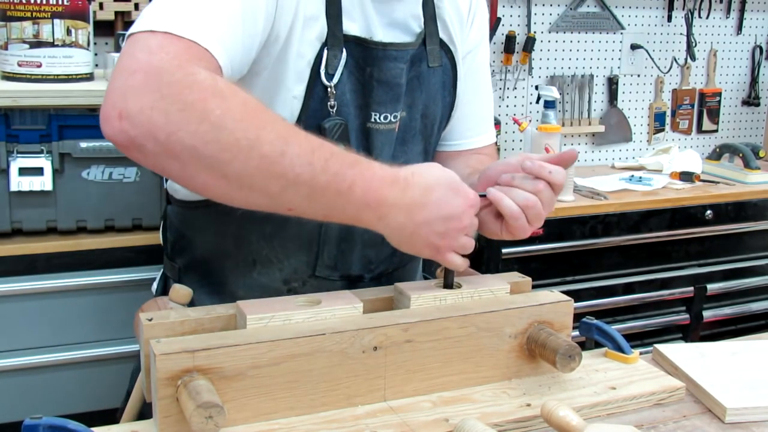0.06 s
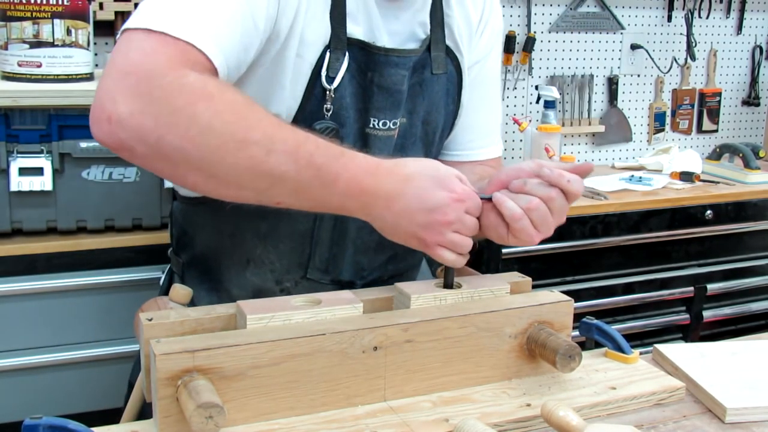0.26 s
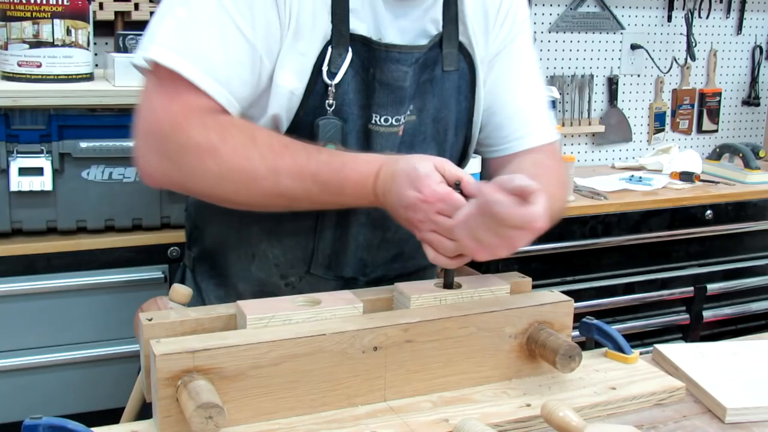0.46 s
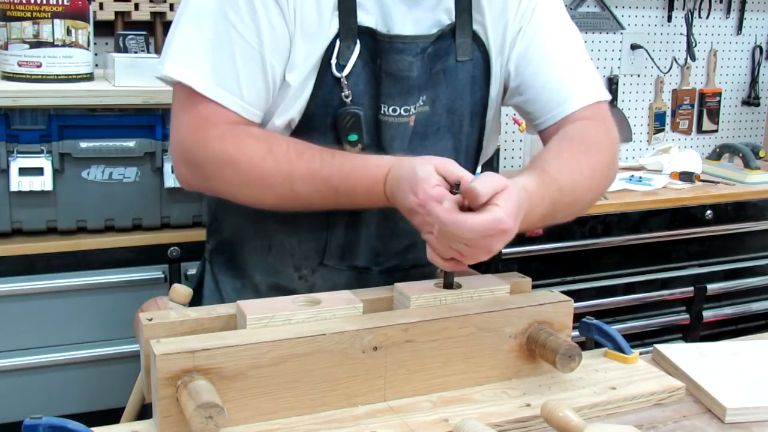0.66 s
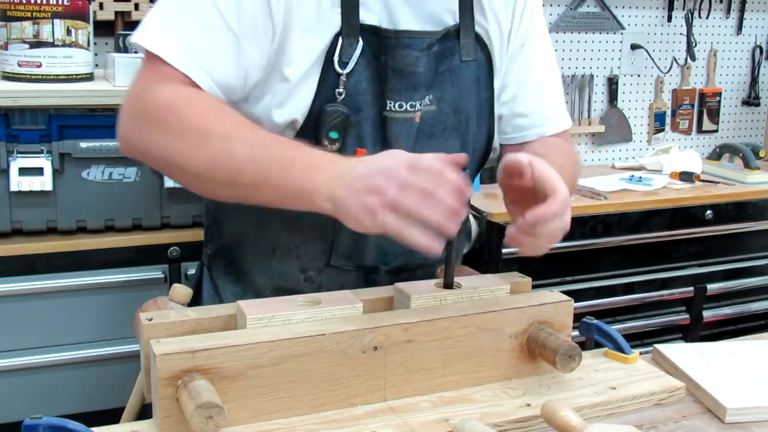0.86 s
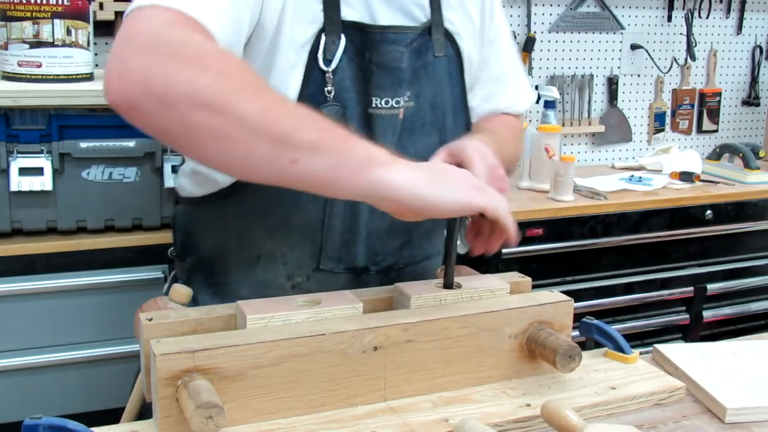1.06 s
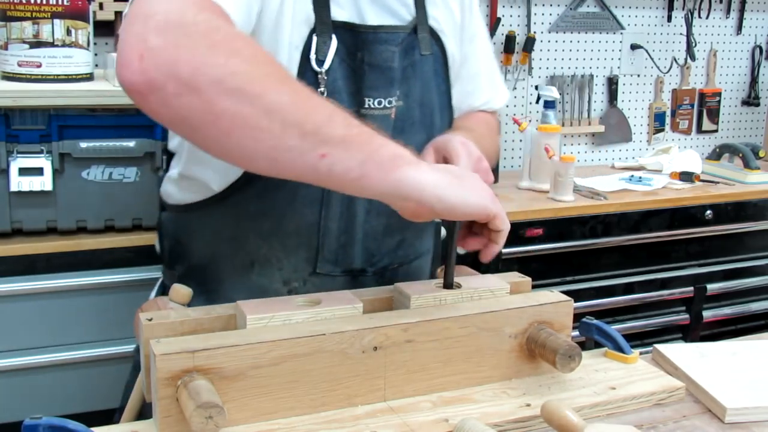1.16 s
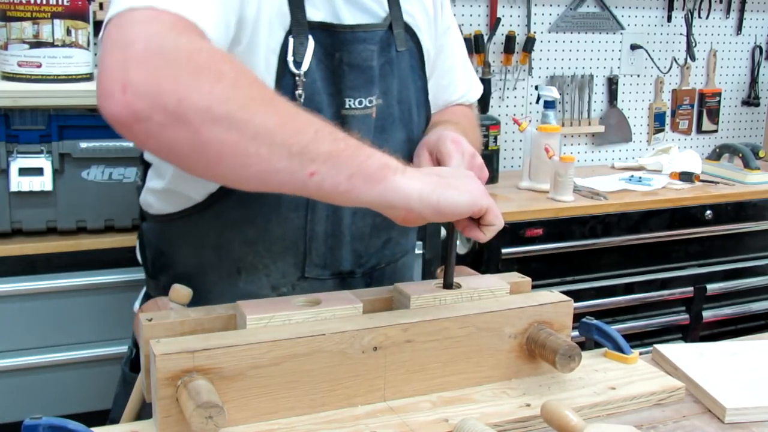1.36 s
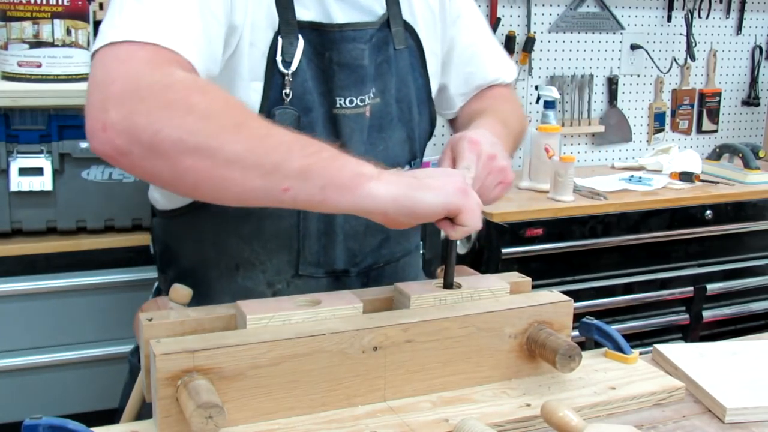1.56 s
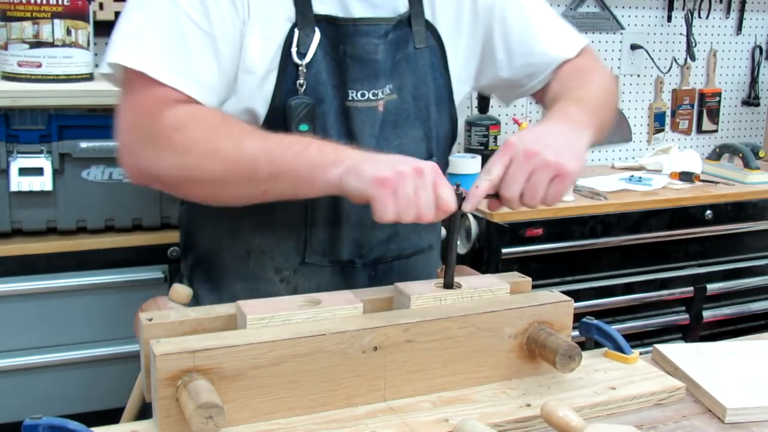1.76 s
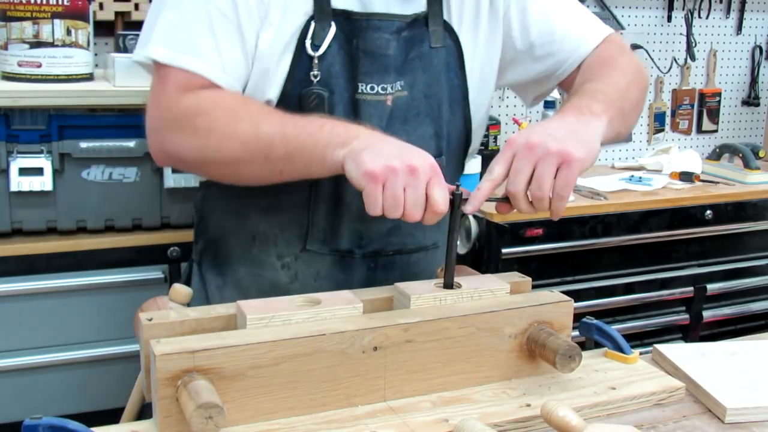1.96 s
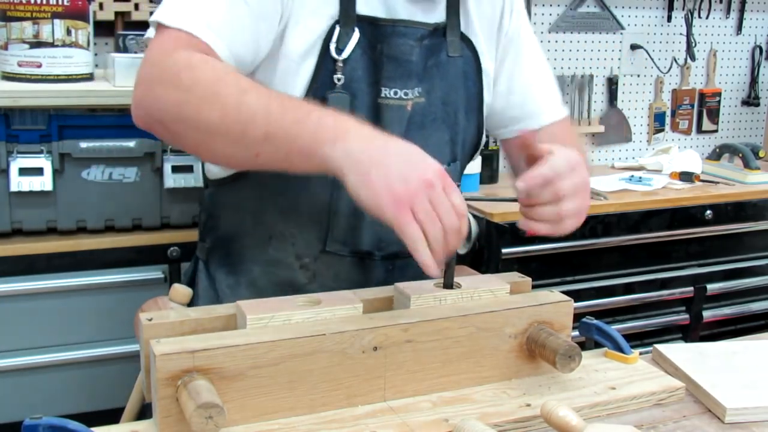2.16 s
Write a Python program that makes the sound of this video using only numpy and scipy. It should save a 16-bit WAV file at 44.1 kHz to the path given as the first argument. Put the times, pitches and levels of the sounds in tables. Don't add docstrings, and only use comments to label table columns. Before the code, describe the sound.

A hand-turned tap scrapes threads into a wooden block, with sharp handle clicks in a small workshop

```python
import sys
import numpy as np
from scipy import signal
from scipy.fft import rfft, irfft, next_fast_len
from scipy.io import wavfile
from scipy.ndimage import uniform_filter1d, map_coordinates

SR = 44100
rng = np.random.default_rng(int(sys.argv[2]) if len(sys.argv) > 2 else 0)


def to_wav(sig):
    pcm = np.clip(np.atleast_2d(sig), -1, 1) * 32767
    pcm = np.round(pcm).astype(np.int16)
    wavfile.write(sys.argv[1], SR, pcm.T)


def convert_level_to_amplitude(level_db):
    exponent = np.asarray(level_db, float) / 20
    return 10 ** exponent


N = 97020

# centre_hz, width_hz, level_db
VISE_RINGS = [(282, 46, -3), (441, 26, -5), (638.6, 35, 1.5)]


def unit(x):
    return x / np.sqrt(np.mean(x ** 2) + 1e-20)


def along(points, hz):
    f, v = np.transpose(points)
    return np.interp(np.log(hz + 1), np.log(f + 1), v)


def levels(rows):
    s, first, *rest = np.transpose(rows)
    t = np.arange(N) / SR
    return [np.interp(t, s, first, -120, -120)] + [np.interp(t, s, column) for column in rest]


def wobble(rate):
    knots = rng.standard_normal(int(N * rate / SR) + 4)
    return map_coordinates(knots, [np.arange(N) * rate / SR])


def swell(s, length):
    return np.exp(-.5 * ((np.arange(N) / SR - s) / (length / 3)) ** 2)


def fade(s, over):
    return 1 / (1 + np.exp(np.clip((s - np.arange(N) / SR) / over, -50, 50)))


def filtered(x, response):
    m = next_fast_len(N + SR // 2)
    return irfft(rfft(x, m) * response(np.fft.rfftfreq(m, 1 / SR)), m)[..., :N]


def body(peaks, broad_db=-120):
    def response(f):
        total = convert_level_to_amplitude(broad_db)
        for k, (centre, width, db) in enumerate(peaks):
            damping = 1j * f * width
            total = total + (-1) ** k * convert_level_to_amplitude(db) * damping / (centre * centre - f * f + damping)
        return total
    return response


def fibres(flutter_db):
    fibres_per_s, spread_db = 3000, 2
    hit = rng.random(N) < fibres_per_s / SR
    size = convert_level_to_amplitude(spread_db * rng.exponential(size=N)) * np.sign(rng.standard_normal(N))
    grains = hit * size + 0.31 * rng.standard_normal(N)
    return grains * convert_level_to_amplitude(flutter_db * (wobble(60.2) + 0.13 * wobble(250)))


def stroke(torn, db, response):
    return filtered(torn * convert_level_to_amplitude(db), response) / np.std(filtered(torn, response))


def first_stroke(torn):
    # time_s, effort_db
    effort = [
        (.215, -75),
        (.235, -50),
        (.272, -39),
        (.285, -32.5),
        (.4, -35),
        (.46, -36.5),
        (.52, -33),
        (.56, -40.5),
        (.62, -58),
    ]
    # centre_hz, width_hz, level_db
    shallow = [(754, 53, -12), (1061, 47, 7), (1280, 140, -2), (1483, 28, 1), (1753, 28, 9), (2275, 52, 3),
               (2690, 300, -6.5), (2960, 120, 0.5), (3335, 180, -0.5), (4550, 83, -3.5), (6200, 130, -12.5),
               (7400, 220, -2.5), (9100, 190, -28), (11400, 690, -12.5)]
    # centre_hz, width_hz, level_db
    seated_rings = [(608, 150, -1), (1145, 45, 7.5), (1272, 34, 8), (1442, 47, 9.5), (1782, 49, 6.5),
                    (2700, 68, 0), (2860, 65, 2), (3210, 78, 2.5), (4020, 200, -8), (4450, 92, -8),
                    (6100, 120, -23), (7020, 340, -2.5), (11600, 190, -33)]
    # centre_hz, width_hz, level_db
    shank = [(1770, 34, -2)]

    def dull(peaks):
        return lambda f: body(peaks, broad_db=-17.5)(f) / (1 + 1j * f / 12000) ** 2

    effort_db, = levels(effort)
    seated = fade(.41, over=.028)
    biting = np.sqrt(1 - seated) * stroke(torn, effort_db + 0.04, dull(shallow))
    settled = np.sqrt(seated) * stroke(torn, effort_db + 1.2, dull(seated_rings))
    binding = swell(.477, length=.077) * stroke(torn, effort_db - 9, body(shank))
    return biting + settled + binding


def second_stroke(torn):
    # time_s, effort_db, vise_load_db, edge_brightness_db
    effort = [
        (1.48, -71, 26, -6),
        (1.54, -56, -5, 7),
        (1.7, -51.5, 11.5, 9.5),
        (1.75, -47, 6, 8),
        (1.815, -45, 10.5, 11),
        (1.835, -40, 11, 12),
        (1.885, -38, 6, 8.5),
        (1.915, -49.5, 10, 0),
        (1.96, -60, -13, 1),
    ]
    # centre_hz, width_hz, level_db
    unloaded = [(1077, 210, -3), (1337, 100, 0), (1640, 107, 0), (1790, 77, 1.5), (2470, 370, -8.5),
                (3010, 74, -6), (3290, 190, -5.5), (4680, 440, -10.5)]
    # centre_hz, width_hz, level_db
    deep = [(1104, 240, -6.5), (1333, 140, 0.5), (1670, 113, 0.5), (1800, 92, 0.5), (2310, 540, -7.5),
            (3000, 97, 2), (3290, 130, -3), (4750, 1100, -15)]
    # centre_hz, width_hz, level_db
    edge = [(6100, 530, -11), (7000, 310, -6.5), (7450, 580, -12), (8350, 290, -11), (9450, 480, -16),
            (12700, 510, -14.5)]
    effort_db, load_db, edge_db = levels(effort)
    loaded = fade(1.722, over=.035)
    entering = np.sqrt(1 - loaded) * stroke(torn, effort_db + 6.5, body(unloaded))
    pressing = np.sqrt(loaded) * stroke(torn, effort_db + 5.5, body(deep))
    jaws = stroke(torn, effort_db + load_db - 6.0, body(VISE_RINGS))
    singing = stroke(torn, effort_db + edge_db - 8, body(edge, broad_db=-26.5))
    return entering + pressing + jaws + singing


def cutting():
    torn = fibres(flutter_db=1.22)
    return first_stroke(torn) + second_stroke(torn)


def slack_turn():
    # time_s, level_db, block_share_db
    rubbing = [
        (0, -53.5, 6),
        (.2, -50.5, 5.5),
        (.3, -56, 13.5),
        (.45, -55.5, 4.5),
        (.7, -57, -2.5),
        (.8, -57, -0.5),
        (.92, -55, -2.5),
        (1, -67, -20),
        (1.06, -100, -9),
    ]
    # centre_hz, width_hz, level_db
    loose = [(1937, 33, -4.5), (2626, 30, -4.5), (4830, 170, -15), (6430, 200, -12.5), (8150, 790, -25),
             (11100, 1400, -19)]
    # centre_hz, width_hz, level_db
    tight = [(1965, 34, -2), (2840, 69, -4.5), (4900, 130, -19), (6340, 140, -14), (8100, 580, -24),
             (10700, 1300, -19.5)]
    # centre_hz, width_hz, level_db
    backing = [(2004, 47, -0.5), (2770, 82, -13), (4720, 100, -7.5), (5140, 120, -6.5), (6230, 130, -9),
               (8100, 800, -13), (10300, 1500, -18.5)]
    # centre_hz, width_hz, level_db
    block = [(758, 84, 7), (1173, 65, -3)]
    level_db, block_db = levels(rubbing)
    rub = fibres(flutter_db=1.2)

    def ring(peaks, broad_db=-29):
        return unit(filtered(rub, body(peaks, broad_db)))

    up, late = fade(.13, over=.049), fade(.46, over=.049)
    early_tap = (1 - up) * ring(loose) + up * ring(tight)
    tap = (1 - late) * early_tap + late * ring(backing)
    return convert_level_to_amplitude(level_db) * (tap + convert_level_to_amplitude(block_db) * ring(block, broad_db=-60))


def squeak():
    # start_hz, end_hz, level_db, stop_s
    partials = [
        (760, 720, -50.5, .27),
        (1970, 2300, -59, 0.232),
        (2640, 2300, -56, 0.28),
    ]
    bend, waver = 2.95, 0.0081
    t = np.arange(N) / SR
    out = np.zeros(N)
    for start_hz, end_hz, db, stop in partials:
        level = convert_level_to_amplitude(db + 2.1 * wobble(33)) * (1 - fade(stop, 0.0089))
        glide_hz = start_hz + (end_hz - start_hz) * np.minimum(t / stop, 1) ** bend
        cycles = np.cumsum(glide_hz * (1 + waver * wobble(82))) / SR
        out += level * np.sin(2 * np.pi * cycles)
    return out


def handle():
    # time_s, tip_db, steel_db, wood_db, low_knock_db
    clicks = [
        (0.2265, -27, -23, -21.5, -37),
        (0.282, -29, -47, -27, -37),
        (0.482, -31, -36, -47, -43),
        (0.5222, -48, -54, -35, -43),
        (0.5373, -16.5, -9.5, -17, -13.5),
        (.5432, -37, -22, -46, -43),
        (0.6585, -23.5, -18.5, -19, -23.5),
        (1.0452, -45, -43, -37, -28.5),
        (1.9418, -41, -36, -44, -24.5),
    ]
    # delay_s, level_db
    chatter = [
        (0, -1),
        (.0005, -3.5),
        (.0012, -4.5),
    ]
    # delay_s, level_db
    surfaces = [
        (.0052, -9.5),
        (.011, -14),
    ]
    # centre_hz, width_hz, level_db
    tip = [(6500, 2600, 4.5), (7830, 1500, 5), (9040, 250, 7), (12300, 2700, -9)]
    # centre_hz, width_hz, level_db
    steel = [(2930, 310, 1), (3600, 360, -1.5), (4920, 330, -4.5)]
    # centre_hz, width_hz, level_db
    wood = [(1520, 1060, -2.5), (1700, 290, 7.5)]
    # centre_hz, width_hz, level_db
    knock = [(441, 82, 1.5), (832, 220, 0)]
    out = np.zeros(N)
    luck = convert_level_to_amplitude(2 * rng.standard_normal((len(clicks), len(chatter))))
    for column, peaks in enumerate((tip, steel, wood, knock)):
        contacts = chatter[:3 if column < 2 else 1]
        push = np.zeros(N)
        for (s, *share), bounce in zip(clicks, luck):
            for k, (late, db) in enumerate(contacts):
                push[round((s + late) * SR)] += convert_level_to_amplitude(db + share[column]) * (bounce[k] if k else 1)
        one_blow = filtered(np.eye(1, N)[0], body(peaks))
        out += filtered(push, body(peaks)) / np.abs(one_blow).max()
    back = sum(convert_level_to_amplitude(db) * np.roll(out, round(late * SR)) for late, db in surfaces)
    return out + filtered(back, lambda f: 1 / (1 + 1j * f / 5000))


def ticks():
    # time_s, level_db, ring_hz, ring_width_hz, snap_db
    touches = [(.5364, -17, 8500, 1500, -10), (.5692, -36, 13500, 3000, -16), (1.9420, -30, 1300, 150, -30),
               (1.019, -31, 7000, 4000, -10), (1.0197, -35, 4400, 700, -25), (1.0202, -39, 6100, 600, -25),
               (1.0255, -48, 3400, 500, -30), (1.1402, -33, 8800, 1500, -9), (1.1665, -39, 8000, 1200, -18),
               (1.1672, -50, 4300, 500, -25), (1.1672, -46, 1000, 300, -30)]
    snap_hz = 5060
    out = np.zeros(N)
    for s, db, hz, width, snap_db in touches:
        def response(f):
            snap = convert_level_to_amplitude(snap_db) * 1j * f / (snap_hz + 1j * f)
            return body([(hz, width, 0)])(f) + snap
        tick = filtered(np.eye(1, N, round(s * SR))[0], response)
        out += convert_level_to_amplitude(db) * tick / np.abs(tick).max()
    return out


def shudders():
    # time_s, length_s, level_db, pitch_hz
    leans = [
        (0.027, 0.25, -43.5, 137),
        (0.488, 0.14, -46.5, 145),
        (0.818, 0.11, -43, 144),
        (1.688, 0.077, -48, 120),
        (1.797, 0.17, -47.5, 148),
        (1.915, 0.072, -47.5, 149),
        (2.165, 0.1, -46, 152.6),
    ]
    sag_per_s = 2.5
    t, waver = np.arange(N) / SR, np.cumsum(0.052 * wobble(50)) / SR
    low = np.zeros(N)
    for s, length, db, hz in leans:
        since = t - s
        cycles = hz * (since + waver - sag_per_s * since ** 2 / 2)
        low += convert_level_to_amplitude(db) * swell(s, length) * np.sin(2 * np.pi * cycles)
    return low * convert_level_to_amplitude(1.1 * wobble(44.8))


def brushing():
    # time_s, length_s, level_db
    brushes = [
        (0.804, 0.063, -51.5),
        (2.15, 0.053, -52.5),
        (0.784, 0.095, -50),
        (2.03, 0.3, -65),
        (0.924, .2, -61),
    ]
    # frequency_hz, density_db
    skin_colour = [(2000, -42), (4500, 4), (8000, 9), (13000, 6.5), (16000, 0)]
    # centre_hz, width_hz, level_db
    nudge = [(325, 300, 0)]
    skin = lambda f: convert_level_to_amplitude(along(skin_colour, f))
    out = np.zeros(N)
    for (s, length, db), colour in zip(brushes, (skin, body(VISE_RINGS), body(nudge), skin, skin)):
        out += convert_level_to_amplitude(db) * swell(s, length) * unit(filtered(rng.standard_normal(N), colour))
    return out


def shop(x):
    # frequency_hz, t60_s
    decay = [(200, 0.15), (2000, 0.22), (6000, 0.26), (14000, 0.16)]
    hz, t, z = signal.stft(rng.standard_normal((2, SR // 2)), SR, nperseg=128)
    dying = z * convert_level_to_amplitude(-60 * t / along(decay, hz)[:, None])
    tail = signal.istft(dying, SR, nperseg=128)[1]
    delayed = np.pad(x, (round(.003 * SR), 0))[None]
    return signal.fftconvolve(delayed, tail / np.linalg.norm(tail[0]), axes=1)[:, :N]


def hush():
    # frequency_hz, density_db
    hush_colour = [(22, -8), (42, 1), (70, -6), (130, -2), (300, -10), (1000, -16), (6000, -27.5),
                   (15500, -41)]
    # frequency_hz, likeness
    alike = [(30, 0.49), (200, 0.14), (1000, 0.56), (8000, 1)]
    level_db, left_db = -48, -1.5

    def mid_side(hz):
        turn = np.arccos(np.clip(along(alike, hz), -1, 1)) / 2
        return convert_level_to_amplitude(along(hush_colour, hz)) * [np.cos(turn), np.sin(turn)]

    mid, side = filtered(rng.standard_normal((2, N)), mid_side)
    pair = unit(np.array([mid + side, mid - side]))
    return convert_level_to_amplitude(level_db + 0.4 * wobble(6.0)) * pair * convert_level_to_amplitude([[left_db], [-left_db]])


def scene():
    left_db, room_db, turn_s = -2, 1, .25
    click_room_db = -2.5
    steady = cutting() + slack_turn() + squeak() + shudders() + brushing()
    clicks = handle() + ticks()
    sent = steady + convert_level_to_amplitude(click_room_db) * clicks
    step = np.arange(N) / SR / turn_s
    room = np.zeros((2, N))
    for k in range(int(step[-1]) + 2):
        share = np.clip(1 - abs(step - k), 0, 1)
        room += shop(sent * share)
    direct = (steady + clicks) * convert_level_to_amplitude([[left_db], [-left_db]])
    return direct + convert_level_to_amplitude(room_db) * room + hush()


def band_edge(x):
    top_hz, edge_hz, sudden_db = 15750, 16800, 9
    top = filtered(x, lambda hz: (hz >= top_hz) & (hz < edge_hz))
    size = np.abs(top).mean(axis=0)
    sudden = uniform_filter1d(size, size=128) > convert_level_to_amplitude(sudden_db) * uniform_filter1d(size, size=4096)
    gate = uniform_filter1d(1. * sudden, size=128)
    return filtered(x, lambda hz: hz < top_hz) + filtered(top * gate, lambda hz: hz < edge_hz)


def top_cut(x):
    return signal.sosfilt(signal.butter(12, 16800, fs=SR, output="sos"), x)


def record(dry):
    mix = band_edge(dry)
    return top_cut(mix)


dry = scene()
out = record(dry)
to_wav(out)
```